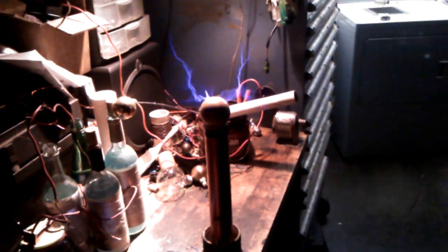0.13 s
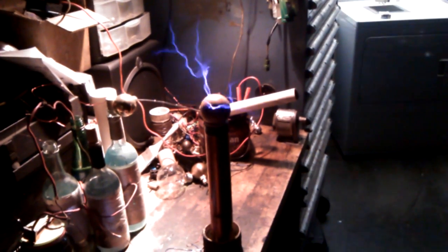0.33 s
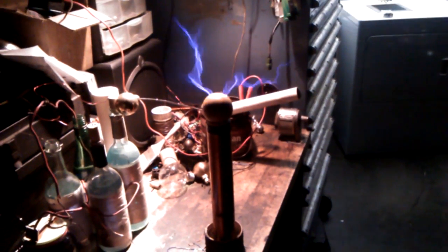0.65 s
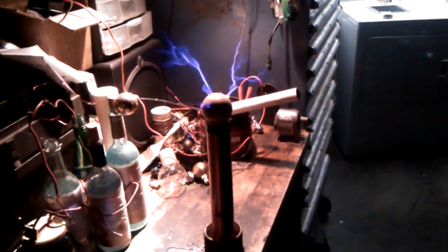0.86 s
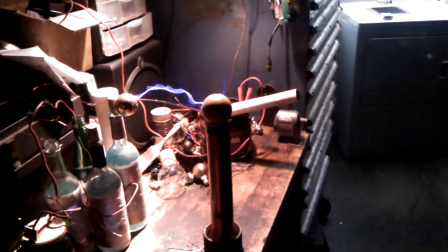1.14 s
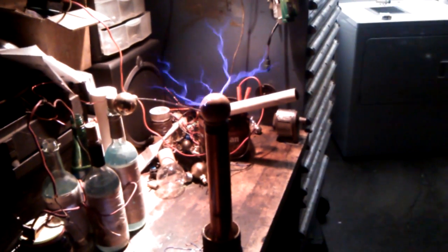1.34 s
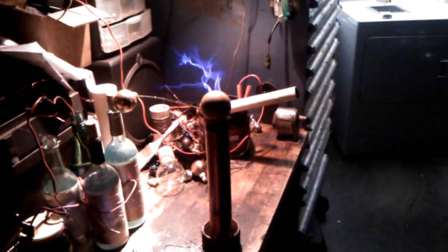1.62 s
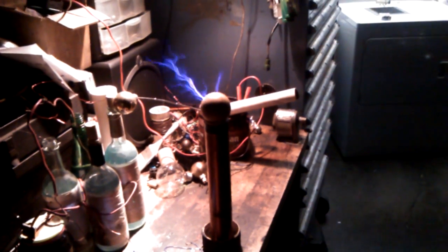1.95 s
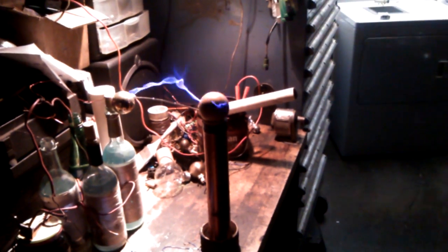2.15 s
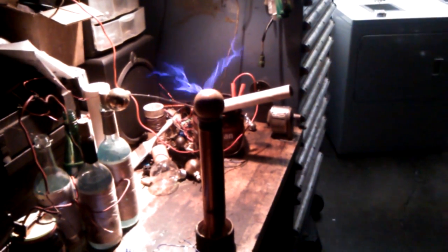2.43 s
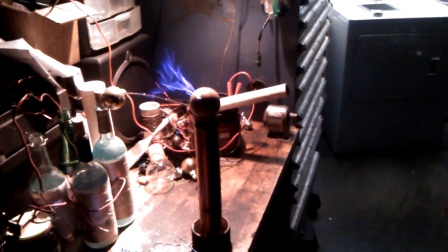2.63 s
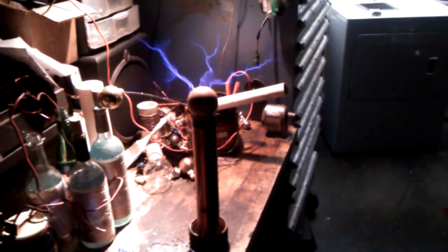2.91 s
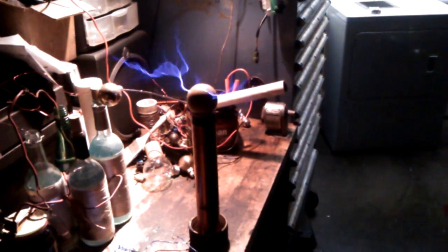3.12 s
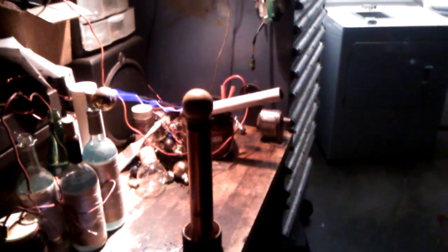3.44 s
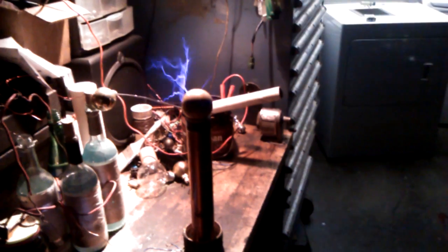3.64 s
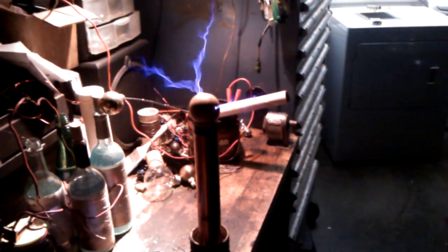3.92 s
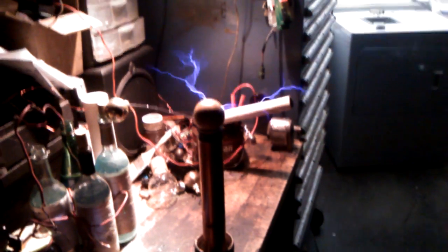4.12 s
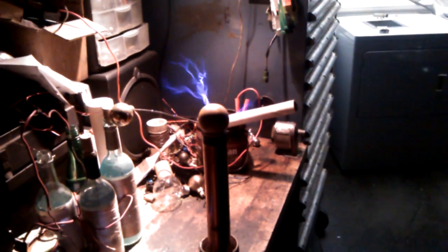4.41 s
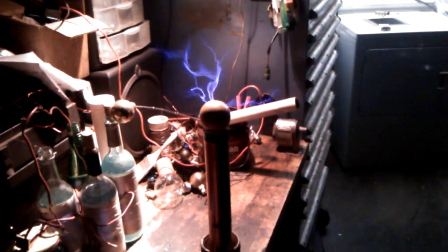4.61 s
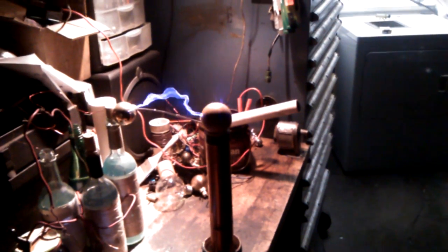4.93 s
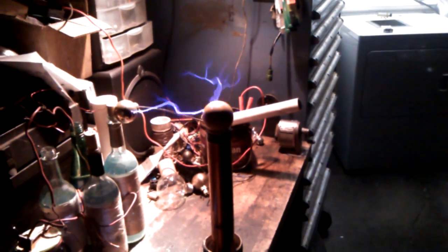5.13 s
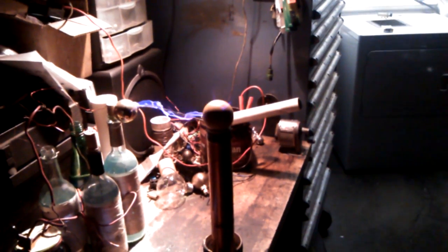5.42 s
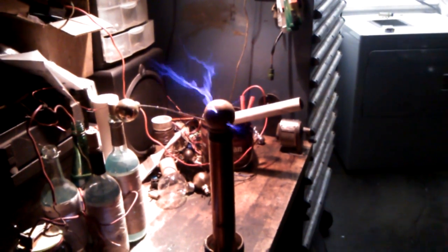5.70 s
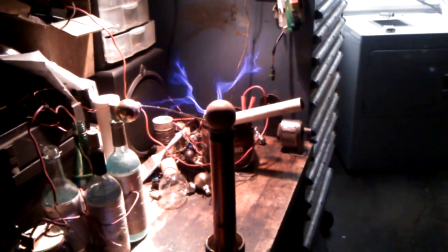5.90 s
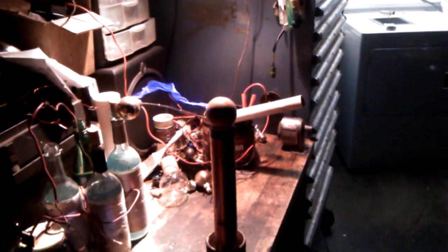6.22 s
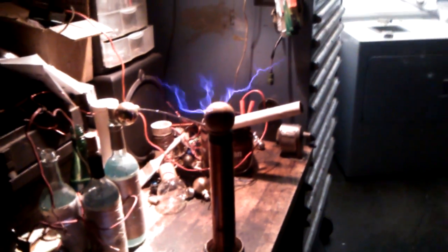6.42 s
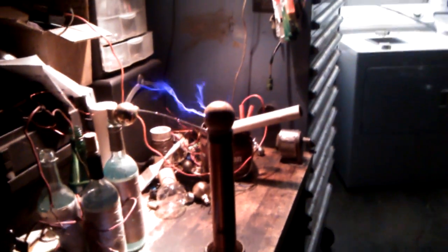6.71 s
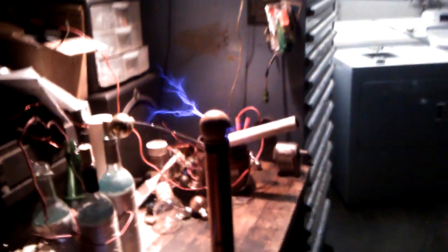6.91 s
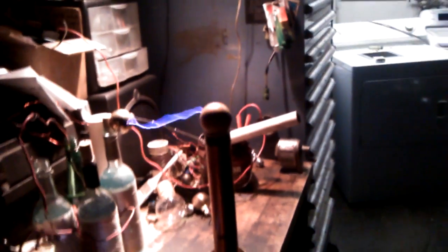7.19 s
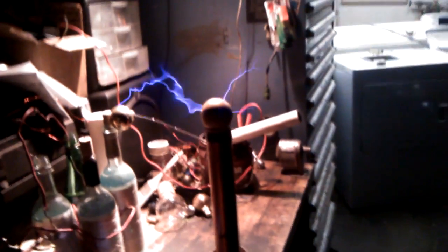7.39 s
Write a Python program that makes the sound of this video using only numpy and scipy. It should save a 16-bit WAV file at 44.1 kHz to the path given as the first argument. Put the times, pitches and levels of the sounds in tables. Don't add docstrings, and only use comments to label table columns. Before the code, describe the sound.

Continuous electric arcing, close up in a cluttered workshop. Some fourteen hundred uneven snaps a second merge into a nasal, gritty buzz topped by piercing crackle and steady glow hiss. Level and tone flutter constantly as streamers leap, with brief dips, stutters and occasional faster, higher forked tones. Soft handling bumps are barely noticeable. The room is short and hard; the small bass-shy microphone sounds sharper by the end, where the buzzing is cut off still running.

```python
import sys
import numpy as np
from scipy import signal
from scipy.fft import rfft, irfft
from scipy.io import wavfile
from scipy.ndimage import uniform_filter1d

SR = 44100
rng = np.random.default_rng(int(sys.argv[2]) if len(sys.argv) > 2 else 0)


def volts_from_db(level):
    exponent = np.asarray(level, float) / 20
    return 10 ** exponent


def generate_wav(sig):
    pcm = np.round(np.clip(np.atleast_2d(sig).T, -1, 1) * 32767).astype(np.int16)
    wavfile.write(sys.argv[1], SR, pcm)


N = 332955

# f/Hz, level/dB [per Hz]
SNAP_COLOUR = [(850, -27.5), (1030, -10.5), (1400, -5), (2000, -2.5), (2700, -3), (3500, -6), (4000, -8.5),
               (5000, -10), (6500, -1.5), (8400, -0.6), (9400, -6), (12000, -8), (13500, -14.5),
               (16000, -17.5)]
# f/Hz, level/dB [per Hz]
SPUTTER_COLOUR = [(150, -42), (250, -29), (450, -17.5), (545, -13.5), (600, -13), (700, -7), (820, -4.5),
                  (890, -10.5), (1000, 3.5), (1150, -12), (1500, -43)]
# f/Hz, level/dB
RUMBLE_COLOUR = [(12, -40), (20, -8), (81, 3.5), (150, -2.5), (330, -5.5), (430, -11), (730, -120)]
# t/s, firing rate f/Hz, arc level/dB, arc thickness/dB, unevenness/dB
DISCHARGE = [(0.0, 1305, -14.5, -2.0, 2.1), (0.4, 1225, -20, -4.1, 2.5), (0.8, 1336.0, -16, -1, 4),
             (1.2, 1416, -17.5, -0.8, -7.5), (1.6, 1448, -21.5, 1.4, -3), (1.9, 1546, -21, 1.5, -5.0),
             (2.5, 1485, -21, -2, -5), (2.9, 1310, -19.5, -0.3, -5), (3.5, 1386, -19, -3.5, 0.96),
             (4.2, 1365, -20.5, 2.4, -2.0), (4.7, 1451, -19.5, -2.5, -0.4), (5.3, 1275, -18, -5.5, -0.3),
             (5.65, 1383, -20, 1, 1.3), (6.05, 1361, -20.5, -3.5, -4.5), (6.6, 1610.0, -23, 0.5, -4),
             (6.88, 1511, -24, -2, -5.3), (7.1, 1444, -16.5, -2.5, 1), (7.55, 1416, -18.5, 4.5, 0.5)]
# t/s, timing jitter/1 [0 to 1]
UNREST = [(0, 0.09), (.5, 0.11), (.9, 0.08), (1.4, 0.09), (1.8, .09), (2.6, .08), (2.9, 0.06), (3.5, 0.07),
          (4.2, .08), (4.95, 0.09), (5.1, 0.05), (5.5, .07), (5.95, .08), (6.05, 0.11), (6.3, 0.09),
          (6.6, 0.04), (6.95, 0.06), (7.55, 0.03)]
# t/s, brightness/dB, rumble level/dB
HANDLING = [
    (0.0, -2.5, -64),
    (0.2, 0.5, -77),
    (1.0, 3.2, -71),
    (1.7, -0.7, -77),
    (2.6, 3.5, -70.5),
    (4.5, 4.5, -68),
    (6.0, 7, -68.5),
    (6.8, 5.5, -65.0),
    (7.1, 5.5, -70),
    (7.55, 11, -59),
]
# t/s, hold/s, level/dB, extra thickness/dB
FLARES = [(0.07, 0.053, 0.8, 4.5), (0.24, 0.031, 4, -1.5), (0.37, 0.21, 1.1, 3.6), (0.83, 0.04, 3.8, -2),
          (1.03, 0.099, 0.8, 1.7), (1.22, 0.011, 7.5, -3), (1.36, 0.16, 4, -0.7), (1.7, 0.044, 3, -0.5),
          (1.92, 0.22, 5, -1.1), (2.28, 0.074, 4.5, -2.6), (2.55, 0.044, 0.5, 3.5), (2.69, 0.12, 3, 1),
          (2.88, 0.15, 2.5, 0.3), (3.11, 0.045, 5.5, 2.2), (3.29, 0.089, 5.5, 2.7), (3.44, 0.21, 2, 3.5),
          (3.75, 0.04, 2.5, 5.5), (3.82, 0.082, 2, -2.3), (3.98, 0.04, 4.5, 1.4), (4.24, 0.0, 2.6, 0.5),
          (4.43, 0.14, 2.2, 0.8), (4.66, 0.024, 6.5, 0.1), (4.79, 0.16, 3.5, 2.5), (5.05, 0.098, 2, 5.5),
          (5.25, 0.072, 5, 0), (5.77, 0.15, 6, 0.2), (6.08, 0.09, 6, -0.7), (6.37, 0.093, 6.5, -4.5),
          (6.72, 0.06, 2.5, 1.3), (6.91, 0.027, 7.5, -1)]
# t/s, hold/s, depth/dB
MISFIRES = [(0.08, 0.16, -2.5), (0.28, 0.0041, -8), (0.41, 0.038, -3.5), (0.93, 0.021, -6),
            (1.15, 0.0082, -15), (1.22, 0.062, -5.5), (1.4, 0.1, -4.5), (1.92, 0.086, -2.5),
            (2.05, 0.04, -7), (2.25, 0.16, -3.6), (2.55, 0.032, -3.5), (2.62, 0.073, -9.5),
            (2.79, 0.11, -4.5), (3.01, 0.094, -2.5), (3.18, 0.07, -4.5), (3.5, 0.054, -4.0),
            (3.96, 0.03, -6), (4.05, 0.17, -4.5), (4.31, 0.07, -4), (4.51, 0.0, -12), (4.73, 0.076, -3.7),
            (5.41, 0.088, -6.5), (5.56, 0.047, -6), (5.77, 0.15, -4.5), (5.98, 0.079, -10), (6.1, 0.17, -4),
            (6.46, 0.045, -1), (7.31, 0.13, -4)]
# t/s, hold/s, shift f/Hz
JUMPS = [(0.36, 0.17, 53.0), (0.7, 0.076, -91.5), (1.07, 0.02, 95.0), (1.34, 0.094, -72.5),
         (2.02, 0.061, -111.0), (2.25, 0.13, -58.5), (2.92, 0.091, 43.5), (3.08, 0.19, 49.0),
         (3.45, 0.061, -100.0), (3.58, 0.017, 92.0), (3.73, 0.084, -48.5), (3.86, 0.087, 46.0),
         (4.06, 0.14, -63.0), (4.22, 0.13, 88.5), (4.57, 0.17, -58.5), (4.83, 0.097, -91.5),
         (5.25, 0.038, 127.0), (5.4, 0.18, 60.0), (5.99, 0.18, 135.5), (6.29, 0.019, 136),
         (6.34, 0.13, -241.0), (6.87, 0.12, -63.5)]
# t/s, hold/s, level/dB
SPITS = [(0.37, 0.063, 5.5), (0.58, 0.11, 5.5), (0.82, 0.028, 6.7), (0.99, 0.098, 6.5), (1.21, 0.028, 7.0),
         (3.26, 0.1, 6.5), (5.1, 0.028, 8.5), (5.24, 0.028, 6.5), (5.85, 0.1, 8), (6.39, 0.058, 9.5),
         (6.78, 0.06, 7), (7.12, 0.1, 3.5)]
# t/s, length/s, added jitter/1 [0 to 1]
STUTTERS = [
    (0.502, 0.025, 0.06),
    (0.677, 0.029, 0.07),
    (1.12, 0.02, 0.1),
    (1.258, .025, 0.1),
    (3.352, 0.041, 0.05),
    (5.298, 0.0294, 0.08),
    (5.931, .05, .07),
    (6.167, 0.03, 0.05),
    (7.165, 0.057, 0.03),
]
# t/s, hold/s, swell level/dB
KNOCKS = [
    (.7, .15, 5),
    (2.3, .05, 7),
    (3.3, .06, 6),
    (4.5, 0.047, 3),
    (5.27, 0.051, 5),
    (5.5, .03, 7),
    (6.8, 0.051, 4),
    (7.4, 0.084, -1),
]
# t/s, hold/s, swell level/dB
HIGH_STRANDS = [
    (1.04, .03, 22),
    (1.62, 0.13, 17),
    (4.0, .03, 8),
    (5.27, .04, 5),
    (6.15, 0.047, 24),
    (7.1, .1, 24.5),
    (7.36, 0.086, 20),
]
TONE_SHARES = 0.38, 0.56, .33

ROOM_T60_S, WALL_CUT_HZ = 0.2, 9300
TONE_TOP_HZ, CRACK_FOOT_HZ = 2000, 5200
FLARE_ATTACK_S, FLARE_RELEASE_S = 0.03, 0.04
JUMP_EDGE_S, MISFIRE_EDGE_S = 0.015, 0.018
TONE_DB, TONE_DB_PER_100_HZ = -17.5, 0.57
BODY_BELOW_DB, SPUTTER_DB, SPUTTER_FLARE_SHARE = -6.5, -49, 0.2
BRIGHTENING_PER_FLARE_DB = 0.4
CORONA_DB = -25
HUM_HZ, HUM_WIDTH_HZ, HUM_DB, HUM_FADE_DB_PER_S = 448, 64, -61.5, -0.5
RUMBLE_FLARE_SHARE, RUMBLE_SPIT_SHARE = 0.8, 0.24
STRAND_RATE_HZ, STRAND_REST_DB = 1820, -49.5


def rms_one(x):
    return x / np.sqrt(np.mean(x ** 2) + 1e-20)


def in_time(rows):
    s, *columns = np.transpose(rows)
    return [np.interp(np.arange(N) / SR, s, c) for c in columns]


def swells(rows, attack_s=FLARE_ATTACK_S, release_s=FLARE_RELEASE_S):
    s, hold_s, *heights = np.transpose(rows)
    step = 50
    since = np.arange(0, N + step, step)[:, None] / SR - s
    rise = np.clip(since / attack_s, 0, 1)
    fall = np.exp(-np.clip(since - attack_s - hold_s, 0, None) / release_s)
    shape = rise * fall
    return [np.interp(np.arange(N) / step, np.arange(len(shape)), shape @ h) for h in heights]


def drift(rate):
    r = np.exp(-2 * np.pi * rate / SR)
    noise = rng.standard_normal(N + SR)
    return rms_one(signal.lfilter([1], [1, -2 * r, r * r], noise)[SR:])


def colour(x, points):
    below = (10, points[0][1] - 40)
    above = (SR, points[-1][1] - 30)
    hz, db = np.transpose([below] + list(points) + [above])
    size = 2 ** 13
    grid_hz = np.arange(size + 1) * SR / size / 2
    log_gain = np.log(volts_from_db(np.interp(np.log(grid_hz + 1), np.log(hz), db)))
    cepstrum = irfft(log_gain)
    cepstrum[1:size] *= 2
    cepstrum[size + 1:] = 0
    response = irfft(np.exp(rfft(cepstrum)))[:size]
    return signal.fftconvolve(x, response)[:N]


def band(x, hz, kind):
    return signal.sosfilt(signal.butter(4, hz, kind, fs=SR, output="sos"), x)


def played(x, level_db, hold_s):
    power = uniform_filter1d(x ** 2, max(int(hold_s * SR), 1), mode="reflect")
    return volts_from_db(level_db) * x / np.sqrt(power + 1e-20)


def firings(rate_hz, jitter, wander, hop, size_db):
    unrest = np.abs(jitter) + 0.02
    paths = np.cumsum(rng.random(N) < 90 / SR)
    hops = rng.uniform(-1.7, 1.7, N)[paths]
    hops -= uniform_filter1d(hops, size=2000)
    rate_now = rate_hz * np.exp(unrest * (wander * drift(120) + hop * hops))
    turns = np.cumsum(rate_now) / SR
    draws = rng.standard_normal((16000, 2))
    nominal = np.interp(np.arange(len(draws)), turns, np.arange(N))
    unrest_then = np.interp(nominal, np.arange(N), unrest)
    waits = 1 + np.clip(0.4 * unrest_then * draws[:, 0], -0.6, 1.5)
    at = np.interp(np.cumsum(waits), turns, np.arange(N), right=N)
    sizes = waits * volts_from_db(size_db * draws[:, 1])
    clicks = np.bincount((4 * at).astype(int), sizes, 4 * N + 1)
    return signal.resample_poly(clicks[:4 * N], 1, 4)


def arc_noise(clicks, burst_s):
    r = np.exp(-1 / (burst_s * SR))
    bursts = signal.lfilter([1], [1, -r], clicks)
    return rms_one(bursts * rng.standard_normal(N))


def workshop(x, hop, room_db):
    t = np.arange(12000) / SR
    starts = np.arange(0, N + hop, hop)
    noise = rng.standard_normal((len(starts), len(t)))
    dull = band(noise, WALL_CUT_HZ, "low")
    bright = noise - dull
    tails = dull * volts_from_db(-60 * t / ROOM_T60_S) + bright * volts_from_db(-60 * t / (0.58 * ROOM_T60_S))
    tails *= np.clip(t / 0.0012, 0, 1)
    tails /= np.sqrt(np.sum(tails ** 2, axis=1, keepdims=True))
    padded = np.pad(x, (hop, 2 * hop))
    fade = np.sin(np.pi * np.arange(2 * hop) / (2 * hop))
    pieces = padded[starts[:, None] + np.arange(2 * hop)] * fade
    pieces = signal.fftconvolve(pieces, tails, axes=1)
    places = starts[:, None] + np.arange(pieces.shape[1])
    echoes = np.bincount(places.ravel(), pieces.ravel())
    return x + volts_from_db(room_db) * echoes[hop:hop + N]


def patchy(x, lift_db, patch_db):
    edges = np.geomspace(CRACK_FOOT_HZ, 17500, 6)
    shares = [0, 0.58, 0.83, 0.78, 1.1]
    total = 0
    for share, low, high in zip(shares, edges, edges[1:]):
        total = total + band(x, [low, high], "band") * volts_from_db(share * lift_db + patch_db * drift(14.4))
    return total


def coil():
    rate_hz, arc_db, thick_db, uneven_db = in_time(DISCHARGE)
    flare_db, fat_db = swells(FLARES)
    rate_hz = rate_hz + swells(JUMPS, JUMP_EDGE_S, JUMP_EDGE_S)[0]
    uneven_db = uneven_db + swells(SPITS)[0]
    jitter = in_time(UNREST)[0] + stutter()

    pitch_db = TONE_DB_PER_100_HZ * (rate_hz - np.mean(rate_hz)) / 100
    misfire_db = swells(MISFIRES, MISFIRE_EDGE_S, MISFIRE_EDGE_S)[0]
    tone_db = TONE_DB + pitch_db + np.dot(TONE_SHARES, [arc_db, flare_db, fat_db]) + misfire_db
    crack_db = arc_db + flare_db
    body_db = crack_db + BODY_BELOW_DB + thick_db + fat_db
    sputter_db = SPUTTER_DB + uneven_db + SPUTTER_FLARE_SHARE * flare_db
    lift_db = in_time(HANDLING)[0] + BRIGHTENING_PER_FLARE_DB * flare_db

    clicks = firings(rate_hz, jitter, wander=0.3, hop=0.7, size_db=-1.0)
    snaps = rms_one(clicks - np.mean(clicks))
    noise = arc_noise(clicks, burst_s=0.00046)
    flutter = volts_from_db(2.9 * drift(140))
    gap_dry = rms_one(clicks * flutter) + 0.023 * noise
    gap = colour(workshop(gap_dry, hop=10000, room_db=2.0), SNAP_COLOUR)
    arc = colour(workshop(snaps + 1.33 * noise, hop=5000, room_db=3.5), SNAP_COLOUR)

    tone = played(band(gap, TONE_TOP_HZ, "low"), tone_db, hold_s=0.041)
    body = played(band(gap, [TONE_TOP_HZ, CRACK_FOOT_HZ], "band"), body_db, hold_s=0.19)
    bends = patchy(arc, lift_db - np.mean(lift_db), patch_db=1.94)
    crack = played(bends, crack_db, hold_s=0.14)
    lumpy = noise * volts_from_db(2 * drift(48))
    sputter = played(colour(lumpy, SPUTTER_COLOUR), sputter_db + 2.0 * drift(3.7), hold_s=0.23)
    third = band(body, 4200, "high")
    body = body + third * (volts_from_db(-0.5 + 2.24 * drift(7.6)) - 1)
    return tone * volts_from_db(2.2 * drift(10.6)) + (body + crack) * volts_from_db(0.83 * drift(29)) + sputter


def corona():
    hiss = colour(rng.standard_normal(N), SNAP_COLOUR)
    return volts_from_db(CORONA_DB) * rms_one(band(hiss, 7500, "high"))


def motor():
    edges = [HUM_HZ - HUM_WIDTH_HZ / 2, HUM_HZ + HUM_WIDTH_HZ / 2]
    hum = rms_one(band(rng.standard_normal(N), edges, "band"))
    fade_db = HUM_FADE_DB_PER_S * np.arange(N) / SR
    return volts_from_db(HUM_DB + fade_db + 2.0 * drift(2.1)) * hum


def rumble():
    level_db = in_time(HANDLING)[1] + swells(KNOCKS)[0]
    level_db = level_db + RUMBLE_FLARE_SHARE * swells(FLARES)[0]
    level_db = level_db + RUMBLE_SPIT_SHARE * swells(SPITS)[0]
    lumpy = colour(rng.standard_normal(N), RUMBLE_COLOUR) * volts_from_db(3.8 * drift(12))
    return played(lumpy, level_db, hold_s=0.3)


def stutter():
    t = np.arange(N) / SR
    return sum(extra * np.exp(-((t - s) / (length / 2)) ** 2) for s, length, extra in STUTTERS)


def high_strand():
    steady = np.ones(N)
    clicks = firings(STRAND_RATE_HZ * steady, 0.08 * steady, wander=0.307, hop=0.5, size_db=-1.0)
    tone = rms_one(band(clicks, [1550, 2150], "band"))
    return volts_from_db(STRAND_REST_DB + swells(HIGH_STRANDS)[0]) * tone


def scene():
    return (coil() + corona() + motor() + rumble() + high_strand())[None]


def band_limit(x):
    return signal.sosfilt(signal.butter(12, 17030, fs=SR, output="sos"), x)


def record(dry):
    rounded = 1.509 * np.tanh(dry / 1.588)
    top_cut = signal.ellip(14, 0.3, 70, 15720, fs=SR, output="sos")
    mix = signal.sosfilt(top_cut, rounded)
    return band_limit(mix)


dry = scene()
out = record(dry)
generate_wav(out)
```